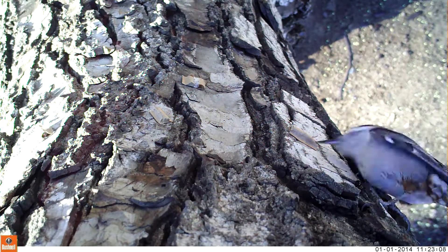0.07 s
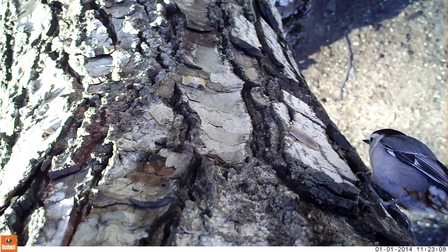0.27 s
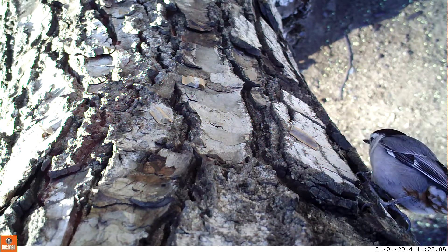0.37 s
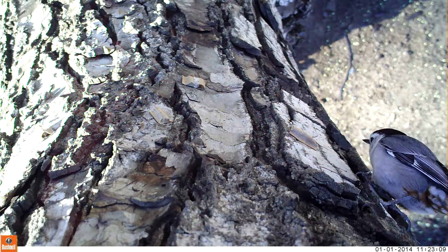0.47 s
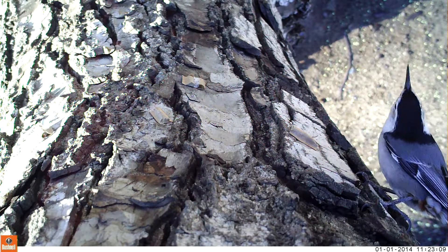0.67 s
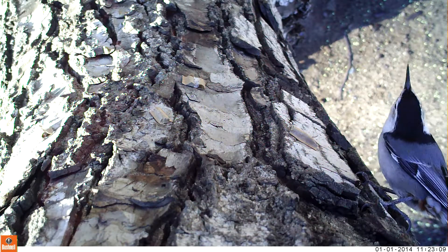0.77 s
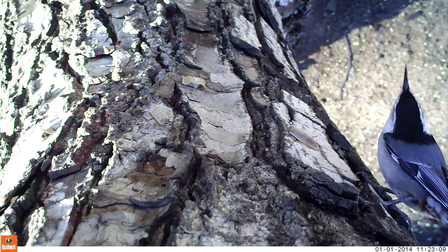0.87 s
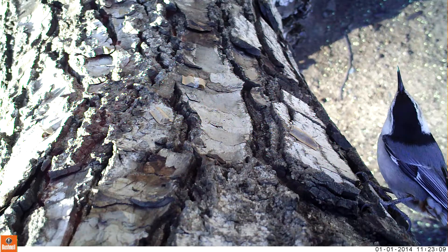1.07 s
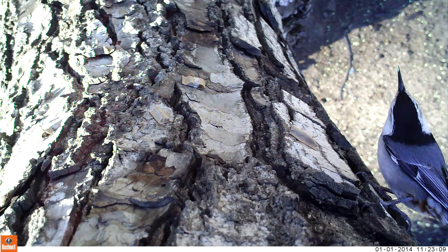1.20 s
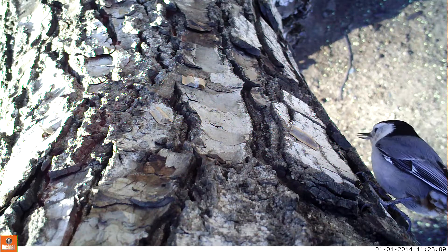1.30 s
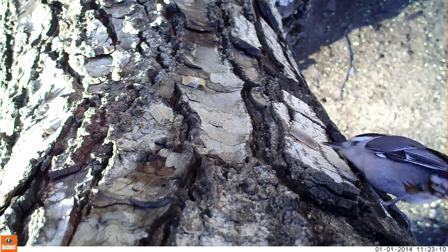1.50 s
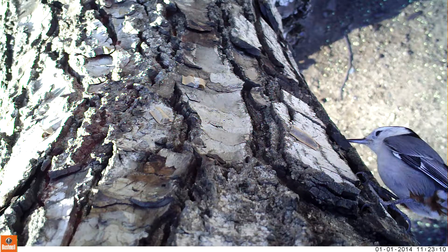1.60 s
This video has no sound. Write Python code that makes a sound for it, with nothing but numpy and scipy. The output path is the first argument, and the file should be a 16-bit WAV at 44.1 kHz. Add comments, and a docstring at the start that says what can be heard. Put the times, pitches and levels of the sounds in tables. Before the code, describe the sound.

One sharp, dry peck on bark close by, over low outdoor rumble and distant chirping.

```python
"""A nuthatch on a tree trunk close by gives one sharp dry tap on the bark and a few lighter ticks.
Each contact of bill or claws is an impulse that rings the bark's resonances for about a millisecond;
the sound then reflects and scatters off trunk, ground and trees.
Small birds chirp far away, in gliding whistles, over a low outdoor rumble."""
import sys
import numpy as np
from scipy import signal
from scipy.fft import rfft, irfft
from scipy.io import wavfile

SR = 44100
rng = np.random.default_rng(int(sys.argv[2]) if len(sys.argv) > 2 else 0)


def master(y):
    """Save y as 16-bit WAV."""
    cut = np.clip(np.atleast_2d(y).T, -1, 1)
    pcm = np.round(cut * 32767)  # scale
    wavfile.write(sys.argv[1], SR, pcm.astype(np.int16))


N = 72765


def undb(db):
    """Amplitude grows tenfold for every 20 decibels."""
    return 10 ** (np.asarray(db) / 20)


def freqs():
    """The frequencies in Hz of a Fourier transform of 2N samples, kept just above zero."""
    return np.arange(N + 1) * SR / (2 * N) + 1e-6


def filtered(x, gain):
    """Zero-phase filtering multiplies the spectrum by a real gain per frequency."""
    return irfft(rfft(x, 2 * N) * gain)[:N]


def ring(gain):
    """Minimum phase: folding the cepstrum gives a causal impulse response with this gain."""
    cepstrum = irfft(np.log(gain + 1e-6))
    cepstrum[1:N] *= 2
    cepstrum[N + 1:] = 0
    return irfft(np.exp(rfft(cepstrum)))[:N]


def resonance(hz, width_hz):
    """The response of a damped oscillator, 1 at its natural frequency."""
    f = freqs()
    return 1 / np.hypot(1, (f / hz - hz / f) * hz / width_hz)


def delayed(x, seconds):
    """A pure delay shifts a sound in time without changing its shape."""
    return np.concatenate([np.zeros(max(int(seconds * SR), 0)), x])[:N]


def walk(rate_hz):
    """Low-passed noise gives smooth random motion with a standard deviation of 1."""
    x = filtered(rng.standard_normal(N), np.exp(-(freqs() / rate_hz) ** 2))
    return x / x.std()


def tail(x, db, t60):
    """Reverberation: dense random reflections decay exponentially, by 60 dB in t60 seconds."""
    response = rng.standard_normal(N) * np.exp(-np.log(1000) * np.arange(N) / SR / t60)
    return signal.fftconvolve(x, response / np.linalg.norm(response))[:N] * undb(db)


def outdoor_rumble(rms_db=-55):
    """Steady noise with a falling spectrum is heard as a low rumble thinning into faint hiss."""
    # The spectrum of the outdoor air. Each row: frequency in Hz, relative spectral density in dB.
    spectrum = [(12, -15.5), (25, -3), (50, -2), (100, -8), (200, -14.5), (400, -23), (800, -30.5),
                (1600, -37), (3200, -41), (5000, -46.5), (13500, -50)]
    hz, db = np.array(spectrum).T
    gain = undb(np.interp(np.log(freqs()), np.log(hz), db))
    noise = filtered(rng.standard_normal(N), gain)
    return noise / noise.std() * undb(rms_db)


def bark_taps(contrast):
    """Impulse excitation: each contact rings bark and struck flake; contrast scales the bark's peaks."""
    # Contacts of bill or claws. Each row: start in seconds, peak level in dB,
    # resonance of the struck flake in Hz, its emphasis in dB.
    contacts = [(.0060, -37, 2500, 17), (.0069, -29.5, 4710, 13.5), (0.2156, -28, 4620, 35),
                (0.217, -7.5, 4500, -8), (1.6241, -37.5, 5410, 17), (1.6271, -46, 3140, 15)]
    # Resonances of the bark. Each row: frequency in Hz, width in Hz, relative level in dB.
    bark_modes = [(2802, 670, -24), (4073, 1000, 2.5), (4870, 700, -1.5), (5694, 1600, -2.5),
                  (6400, 600, -12), (9450, 650, -8.5), (10610, 800, -4), (10730, 650, -8)]
    low_hz, top_hz, skirt_exponent = 2370, 11800, 1.646
    f, out = freqs(), np.zeros(N)
    power = sum((undb(db) * resonance(hz, width) ** skirt_exponent) ** 2 for hz, width, db in bark_modes)
    bark = np.sqrt(power) ** contrast
    bark = bark / np.hypot(1, (low_hz / f) ** 3) / np.hypot(1, (f / top_hz) ** 12)
    for start, db, flake_hz, flake_db in contacts:
        flake = np.hypot(1, undb(flake_db) * resonance(flake_hz, width_hz=1200) ** 2)
        click = ring(bark * flake)
        out += delayed(click, start) * undb(db) / np.abs(click).max()
    return out


def with_reflections(direct, radiated):
    """Near surfaces mirror the direct sound; rough trunk, ground and trees scatter the radiated sound."""
    # Close reflections. Each row: delay in seconds, gain in dB, treble limit in Hz.
    echoes = [(.0021, -42.5, 8000), (.0035, -25, 6000)]
    # Diffuse scatter. Each row: delay in seconds, gain in dB, reverberation time in seconds,
    # low and high band edges in Hz.
    scatter = [(.001, -25, .02, 2520, 8000), (.0066, -24.5, 0.02874, 7800, 14000),
               (.01, -33.5, .36, 2200, 6910)]
    f, out = freqs(), direct
    for lag, db, hz in echoes:
        dulled = filtered(direct, 1 / np.hypot(1, (f / hz) ** 2))
        out = out + undb(db) * delayed(dulled, lag)
    for lag, db, t60, low_hz, high_hz in scatter:
        band = filtered(radiated, 1 / np.hypot(1, low_hz / f) / np.hypot(1, f / high_hz))
        out = out + delayed(tail(band, db, t60), lag)
    return out


def distant_birds():
    """Random frequency modulation makes gliding whistles rasp; reverberation among trees blurs them."""
    # Far chirps. Each row: start and length in seconds, first and last pitch in Hz,
    # level in dB, roughness from 0 to 1.
    chirps = [(.042, 0.049, 3580, 3410, -66.5, 0.96), (0.111, .055, 3720, 3503, -76, 0.87),
              (0.166, 0.058, 3430, 3950, -70, .9), (0.626, 0.03, 3440, 3540, -77.5, .8),
              (.865, 0.033, 3285, 3155, -76, 0.04), (.868, .05, 4085, 4250, -78, 0.13),
              (0.92, 0.081, 3800, 3366, -75.5, 0.08), (0.979, .036, 3200, 2806, -67.5, .04),
              (1.003, .035, 2905, 2575, -74.5, 0.09), (0.992, 0.092, 3310, 3140, -82.5, 0.5),
              (1.038, .03, 3870, 3470, -74.5, 0.17), (1.245, .09, 3520, 3710, -79.5, 0.58),
              (1.45, .04, 3200, 3200, -81.5, 0.18), (1.481, 0.034, 3400, 3690, -77, .6),
              (1.635, .025, 4320, 5100, -70, 0.4)]
    rasp_hz, flutter_db = 550, 1
    t, out = np.arange(N) / SR, np.zeros(N)
    for start, length, start_hz, end_hz, db, roughness in chirps:
        progress = np.clip((t - start) / length, 0, 1)
        glide = start_hz + (end_hz - start_hz) * progress
        hz = glide + roughness * rasp_hz * walk(rate_hz=900)
        envelope = undb(db) * np.sqrt(2) * np.sin(np.pi * progress)
        out += envelope * np.sin(2 * np.pi * np.cumsum(hz) / SR)
    out = out * undb(flutter_db * walk(rate_hz=48))
    return out + tail(out, db=-5, t60=0.41)


def scene():
    """Superposition: the near taps add to the rumble and the far birds in one channel."""
    rumble = outdoor_rumble()
    direct = bark_taps(contrast=0.97)
    radiated = bark_taps(contrast=0.69)  # sound leaving in all directions shows the resonances less
    return (rumble + with_reflections(direct, radiated) + distant_birds())[None]


def record(dry, cutoff_hz=13750):
    """Band limiting: an elliptic low-pass filter cuts the highest treble steeply."""
    return signal.sosfilt(signal.ellip(10, .1, 80, cutoff_hz, fs=SR, output="sos"), dry)


dry = scene()
out = record(dry)
master(out)
```